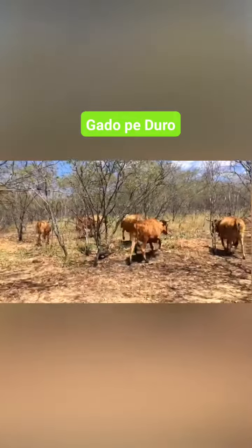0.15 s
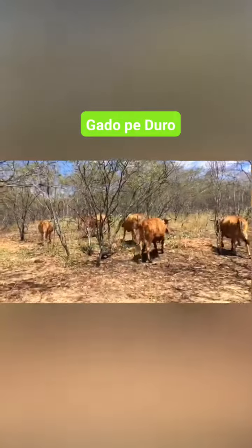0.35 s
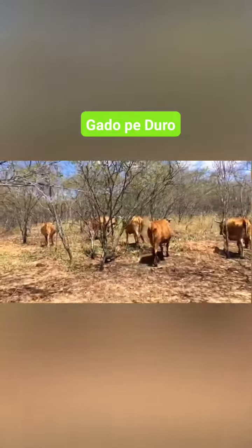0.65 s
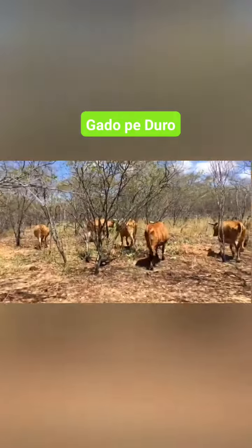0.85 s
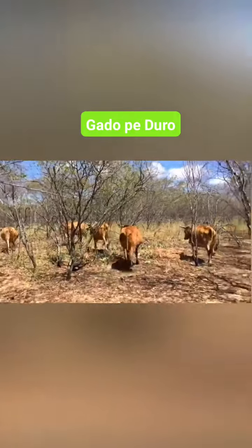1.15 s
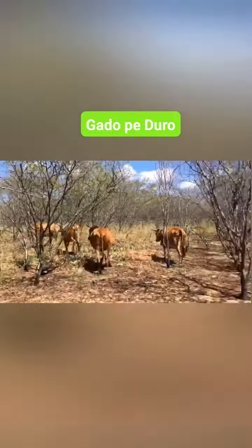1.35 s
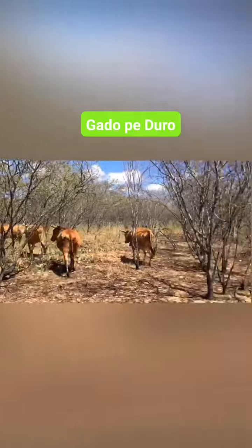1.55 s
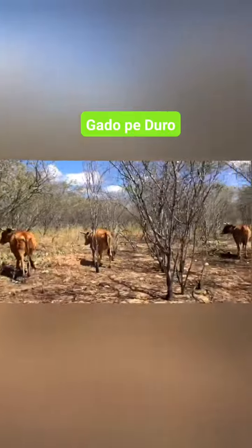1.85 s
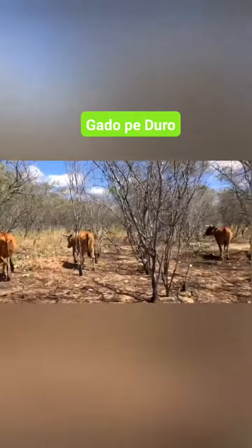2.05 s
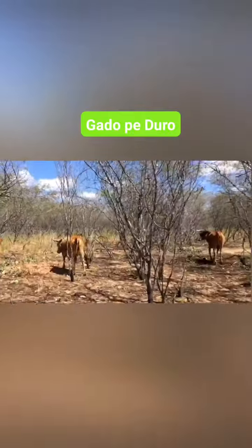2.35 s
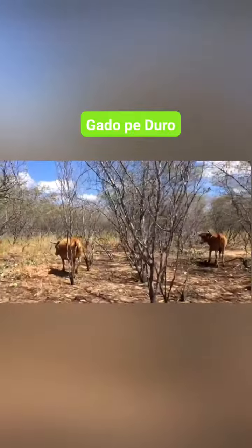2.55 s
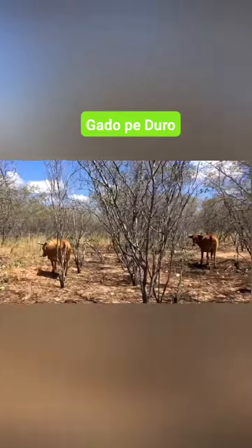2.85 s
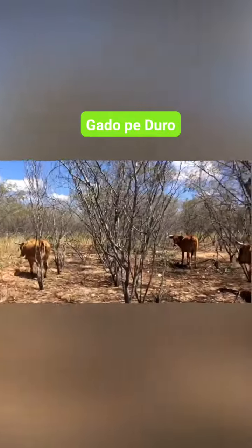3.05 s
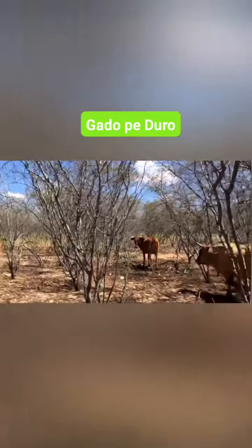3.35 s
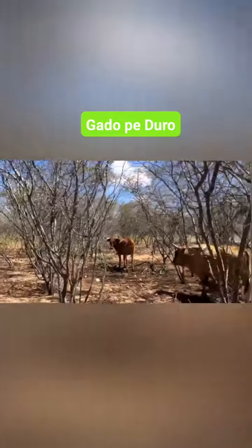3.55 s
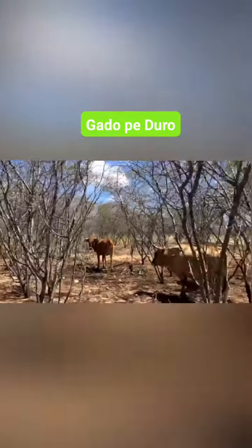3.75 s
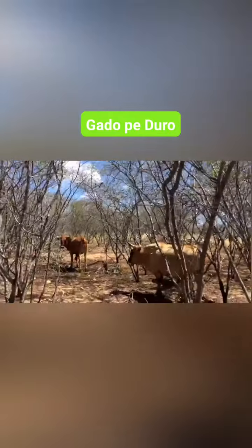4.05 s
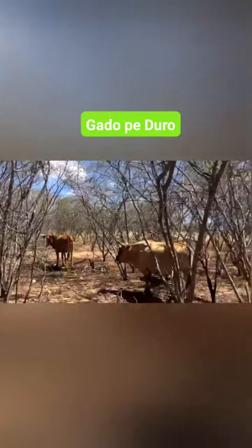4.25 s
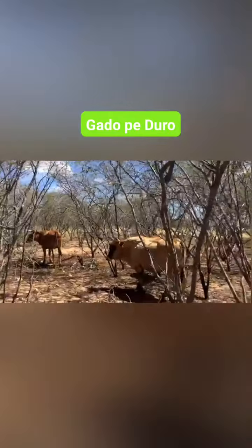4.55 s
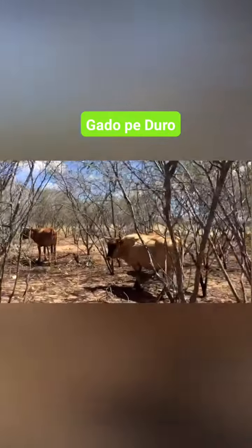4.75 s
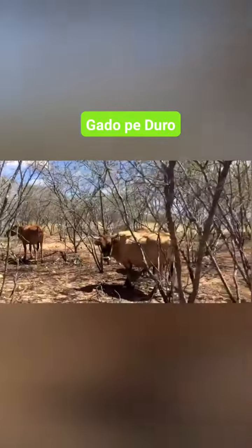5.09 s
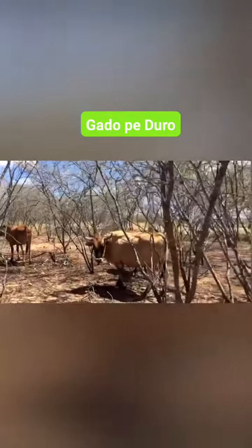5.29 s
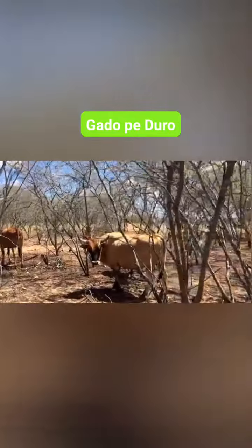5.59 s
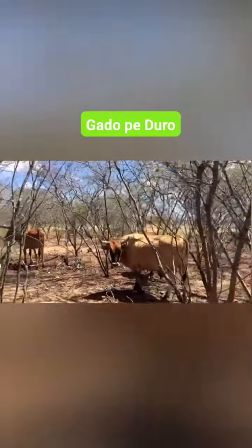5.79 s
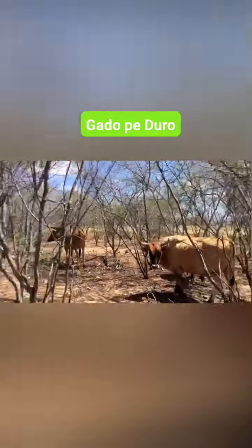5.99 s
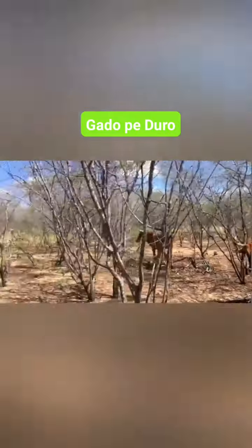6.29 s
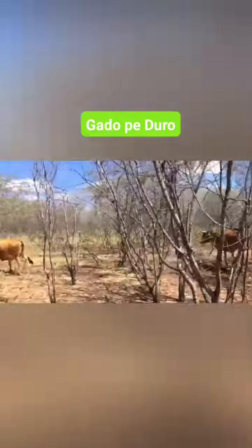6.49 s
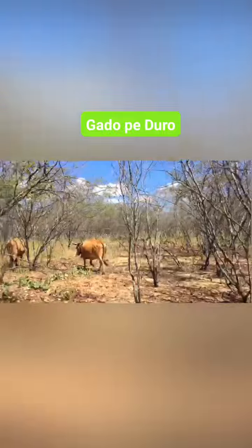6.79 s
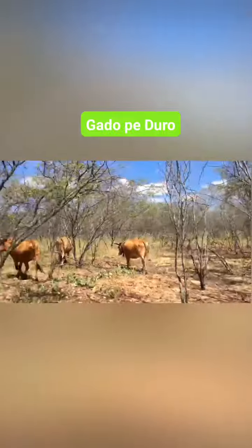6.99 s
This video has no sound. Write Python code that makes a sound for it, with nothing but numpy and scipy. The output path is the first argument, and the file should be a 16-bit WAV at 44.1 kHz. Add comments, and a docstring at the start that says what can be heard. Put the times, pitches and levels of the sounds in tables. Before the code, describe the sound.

Two sheet-iron cowbells clank close by in irregular, overlapping blows, dense and strong for the first two seconds, then sparser and softer. A third bell rings faintly farther off. Hooves thud softly on dry earth, leaves crunch and twigs crack, especially midway. Outdoors in open scrub with a thin echo; low wind gusts bump the handheld microphone, strongest around five seconds.

```python
"""A sheet-iron bell is still ringing as cattle walk close by through dry scrub, a second bell beside it.
Each clapper blow rings a low hum, two strong wall modes and a cloud of overtones, all decaying sines.
A third bell rings further off with its longest modes alone. Hooves thud and crush dry leaves and twigs
snap, all shaped noise with a thin echo from the scrub. Still air and gusts of wind on the microphone,
filtered noise with moving levels, lie over it all."""
import sys
import numpy as np
from scipy import signal
from scipy.fft import rfft, irfft, next_fast_len
from scipy.io import wavfile
from scipy.ndimage import uniform_filter1d

SR = 44100
rng = np.random.default_rng(int(sys.argv[2]) if len(sys.argv) > 2 else 0)


def file_out(sig):
    """Save sig as 16-bit WAV at sys.argv[1]."""
    # one column per channel
    cols = np.atleast_2d(sig).T
    # limit, then scale
    lim = np.clip(cols, -1, 1)
    pcm = np.round(lim * 32767).astype(np.int16)
    wavfile.write(sys.argv[1], SR, pcm)


N = 314433
TIME = np.arange(N) / SR  # seconds

# Clapper blows on the two near bells. Each row: start in seconds, strength in dB, hardness in dB,
# place on the wall from 0 (broad face) to 1 (folded edge).
LEAD_BLOWS = [(.095, -41, -12, .1), (.152, -26.5, 1.5, 0.81), (.336, -18, -8.5, 0.031),
              (.372, -28, -3, 0.94), (.51, -27, -9, 0.31), (.738, -21, -8, 0.69), (.907, -31, 14, 0.1),
              (1.034, -28.5, -4, 0.16), (1.206, -38.5, 0.5, .03), (1.328, -35.5, 5.5, 0.65),
              (1.498, -24.5, 2, 0.75), (1.623, -33, -0.5, 0.095), (1.753, -29, -15, .15),
              (1.837, -45, 4.5, 0.37), (1.906, -36.5, 1, .16), (1.929, -28.5, 0.5, 0.53),
              (2.113, -37.5, 0.5, 0.49), (2.183, -42, 5, 0.57), (2.227, -44, -2, 0.58),
              (2.655, -38, -2.5, .03), (2.748, -38.5, -1.5, 0.86), (2.785, -33.5, 2, 0.56),
              (3.198, -35, 4.5, 0.63), (3.364, -29, -1.5, .77), (3.76, -36.5, 1, 0.37),
              (3.998, -35.5, 5.5, 0.86), (4.1, -33.5, -4, 0.59), (4.328, -40, -3, 0.64),
              (4.418, -36, 4, 0.59), (4.678, -41, 9.5, 0.39), (4.773, -41, -10.5, 0.22),
              (5.063, -40, 1.5, 0.54), (5.282, -40.5, 4.5, 0.62), (5.345, -39.5, 2.5, 0.5),
              (5.739, -40, 4, 0.9), (5.962, -42.5, 6, 0.43), (6.358, -50, 12.5, 0.9),
              (6.58, -40.5, 1, 0.23), (6.81, -50, 6, 0.21), (6.997, -49, 10, 0.18)]
SECOND_BLOWS = [(.057, -38.5, 3, 0.13), (.311, -28.5, 4, 0.041), (.95, -37.5, 5, 0.063),
                (2.543, -34, 4, 0.11), (3.057, -34, 8.5, 0.073), (3.679, -34.5, -3, .03),
                (3.698, -49.5, 16.5, 0.27), (4.03, -41.5, 7, .1), (5.103, -35, 8, 0.36),
                (5.79, -34, 10, 0.28), (6.491, -34, 6.5, 0.66), (7.029, -48.5, 23, 0.16),
                (7.108, -42.5, 10, 0.44)]
# Modes of the near bells in six families: low hum (short mouth note and long, low bending modes of the wall),
# first wall mode (the lead's with its overtone), second wall mode, overtones, upper overtones, shimmer.
# Each row within a family: frequency in Hz, relative level in dB, time to fall 60 dB in seconds.
LEAD_BELL = [
    [(653.5, 4, .28), (630, 1, .1), (620, -14, 1.4), (645, -10, .75)],
    [(1621, 0, 1.35), (3477, -6.5, .36)],
    [(1683, 0, 1.05)],
    [(2488, -24, .6), (2663, -16, .3), (2764, -4, .3), (2846, -6, .28), (2959, -5.5, .55),
     (3133, -11.5, .8)],
    [(3414, -15, .3), (4042, -7, .3), (4154, 0, .42), (4365, -18, .45), (4520, -11, .2)],
    [(5079, -8, .22), (5283, -9, .14), (5410, -11, .22), (6075, -10, .26), (6262, -6, .26), (6627, -8, .24),
     (6768, -10, .2), (7290, -8, .2), (8135, -11, .17), (8679, -9, .17), (9029, -7, .19), (9214, -9, .16),
     (9680, -10, .19), (10232, -10, .16), (10356, -10, .16), (11280, -11, .14)],
]
SECOND_BELL = [
    [(672, 4, .48), (648, -13, 1.1), (630, -6, .1), (620, -15, 1.4)],
    [(1700.5, 0, .55)],
    [(1786, 1, 1.8)],
    [(2525, 0, .27), (2642, -7, .5), (2815, -7, .25)],
    [(3136, -10, .6), (3205, -6, .7), (3293, -6, .23), (3370, -14, .4), (3937, -6, .4), (4021, -7, .35)],
    [(5066, -7, .25), (5398, -10, .3), (5640, -12, .15), (6090, -13, .2), (6950, -12, .22),
     (7800, -12, .17), (8700, -12, .13), (8830, -10, .14), (10140, -10, .17), (11260, -11, .16)],
]
# How the six families answer a blow. Each row: level in dB struck on the face, level in dB struck on the edge.
LEAD_ANSWER = [(-2.5, 3), (-0.5, -24), (-25, 0), (0, 0.5), (-8, -15), (-11.5, -7)]
SECOND_ANSWER = [(2, 2.5), (1, -26), (-14, 0.5), (-11, 6), (-11.5, -5.5), (-8, -3.5)]
# Share of a blow's hardness that reaches each family [factor]; the first and second wall modes
# follow almost strength alone.
HARDNESS_SHARE = [0.83, 0, 0.055, 0.91, 1, 0.96]
# How well each bell's low hum carries as the animal turns. Each row: time in seconds, gain in dB.
LEAD_FACING = [(0, -6.5), (1.55, -5.5), (2, 0), (4.4, -2), (5.2, 3.5), (6, 2), (7, 11.5)]
SECOND_FACING = [(.3, -4.5), (2.5, -0.5), (5.8, -0.5), (7.1, -6.5)]
# Wall modes already sounding at the start. Each row: frequency in Hz, level in dB, 60 dB decay in seconds.
EARLY_RING = [(590, -58, 2.7), (675, -47, 0.36), (1620, -36, 1), (1745, -45, 0.42), (1890, -61, 0.91),
              (3010, -43, 0.22)]
# Lowest and highest centre of the cloud of weak modes [Hz].
CLOUD_HZ = 4500, 12400
# Crack of iron on iron. Each row: frequency in Hz, relative level in dB.
CRACK_COLOUR = [(300, -21), (900, 13.5), (2000, 19.5), (3000, 19.5), (5000, 12.5), (9000, -1), (13000, -32)]

# Hoof falls. Each row: time in seconds, thud level in dB, crunch level in dB.
STEPS = [(0.529, -50, -61), (0.659, -41.5, -54), (0.827, -48, -57), (1.9, -75, -56), (2.438, -60, -53),
         (2.904, -53, -62), (3.4, -68, -51), (3.5, -64, -50), (3.718, -46, -65), (3.856, -39.5, -49),
         (4.17, -51, -67), (4.769, -57, -51), (6.121, -77, -67), (6.432, -33, -48.5), (6.92, -58, -67)]
# Animals brushing through dry leaves. Each row: peak in seconds, level in dB, half length in seconds.
BRUSHES = [(.6, -61, 0.37), (3.3, -61, 0.37), (6.76, -53, .04), (7.11, -62, 0.034)]
# Spectra of crushed leaves and of thuds on dry earth. Each row: frequency in Hz, relative level in dB.
LEAF_COLOUR = [(200, -10), (600, -1), (1300, 0), (2200, -8), (5000, -12), (9500, -12), (13000, -28)]
THUD_COLOUR = [(40, -41), (130, -4.5), (220, 1.5), (340, -4.5), (550, -36), (1500, -35)]
# Snapping twigs. Each row: start in seconds, level in dB, brightest frequency in Hz.
TWIGS = [(.662, -55, 1770), (2.44, -45.5, 1510), (3.033, -45, 2000), (3.308, -32, 2390),
         (3.36, -26.5, 1070), (3.376, -43, 4940), (3.646, -41.5, 1490), (3.967, -43, 1930),
         (4.161, -44, 1000), (4.402, -35, 1730), (4.775, -37.5, 1500), (4.879, -46, 2900),
         (6.232, -50.5, 2900), (6.688, -42.5, 5970), (6.715, -39, 5700), (6.791, -50, 4000)]

# Blows on the bell further off. Each row: start in seconds, low mode level in dB, high modes level in dB.
FAR_BLOWS = [(0.274, -47, -46), (0.898, -48.5, -46), (1.207, -65.5, -40), (1.906, -53, -44),
             (2.227, -49.5, -42), (4.102, -51.5, -47.5), (4.519, -51, -48.5), (5.061, -66, -44)]
# Modes of that bell. Each row: frequency in Hz, relative level in dB, time to fall 60 dB in seconds.
FAR_LOW = [(948, 0, 2.0)]
FAR_HIGH = [(2385, 0, .9), (4520, -3, .45)]
# Echo from trunks and ground. Each row: frequency in Hz, relative level in dB.
ECHO_COLOUR = [(200, 5), (2500, 9), (5000, -24), (12000, 5.5)]

# Light breeze on the microphone, before trim and flutter. Each row: time in seconds, level in dB.
BREEZE = [(0, -68), (.3, -56.5), (.65, -68), (1.8, -64.5), (2.3, -54.5), (2.85, -67.5), (3.3, -59),
          (3.75, -62), (4.3, -49.5), (5.8, -42.5), (6.5, -47.5), (6.9, -66)]
# Gusts, and at 3.85 s the low thump of a hoof fall; trim and flutter act only on their rumble, not on
# their small eddies. Each row: peak in seconds, level in dB, half length in seconds.
GUSTS_AND_THUMP = [(2.211, -26.5, 0.029), (2.4, -30, 0.028), (2.573, -38.5, 0.019), (3.382, -39.5, 0.052),
                   (3.847, -33.5, 0.0026), (4.094, -31.5, 0.025), (4.267, -34.5, 0.028),
                   (4.352, -33, 0.033), (4.624, -35, 0.021), (4.743, -50, 0.012), (4.906, -29.5, 0.026),
                   (4.987, -16.5, 0.012), (5.015, -20.5, 0.022), (5.13, -23.5, 0.008), (5.238, -24, 0.011),
                   (5.267, -29.5, .03), (5.45, -38, 0.024), (5.541, -24.5, 0.03), (6.04, -31, 0.035),
                   (6.31, -40, 0.019), (6.409, -18.5, 0.0084), (6.444, -27.5, 0.027)]
# Spectra of wind rumble, small eddies and still air. Each row: frequency in Hz, relative level in dB.
WIND_COLOUR = [(15, -82), (30, 3.5), (52, 3.5), (80, 3), (125, -7), (200, -14.5), (320, -43), (600, -53),
               (2000, -99)]
BUFFET_COLOUR = [(20, -35), (55, 3.5), (130, 8.5), (250, -5), (450, -20), (800, -36), (2500, -111)]
AIR_COLOUR = [(20, -12), (60, 0), (150, 1), (400, -4), (1000, -7), (2000, -14), (5000, -26), (10500, -30),
              (13000, -45)]


def cowbell(blows, bell, cloud_db, cloud_t60, crack_db, grip, taps_db, scrape_db):
    """Each blow partly chokes the walls' old ring, then strikes the modes, the cloud and an iron crack."""
    walls, hum, contact = np.zeros((3, N))
    cloud_hz = np.linspace(*CLOUD_HZ, 110) + rng.uniform(-70, 70, 110)
    # cloud_t60 holds at 7 kHz; higher modes die sooner
    cloud = [(hz, cloud_db, cloud_t60 * 7000 / hz) for hz in cloud_hz]
    touch = 1 - np.exp(-TIME / 0.0014)
    crack_fade = fade(.05)
    for start, hum_db, first_db, second_db, over_db, upper_db, shimmer_db in blows:
        i = int(start * SR)
        choke = min(grip * undb(.5 * (shimmer_db + 38.0)), .9)
        walls[i:] *= 1 - choke * touch[:N - i]
        # the low hum takes a few cycles to swing up, and is not choked
        add(hum, start, undb(hum_db) * ring(bell[0], 0, rise=.0048))
        add(walls, start, undb(first_db) * ring(bell[1], 0, rise=0.0039))
        add(walls, start, undb(second_db) * ring(bell[2], 0, rise=0.00086))
        # the higher modes answer every small contact of the clapper, in a new mix each time
        push = chatter(shimmer_db, taps_db, scrape_db)
        high_families = [(over_db, bell[3], 2.5), (upper_db, bell[4], 3), (shimmer_db, bell[5] + cloud, 4)]
        for level_db, modes, scatter_db in high_families:
            add(walls, start, undb(level_db) * signal.fftconvolve(ring(modes, scatter_db), push))
        add(contact, start, undb(shimmer_db + crack_db) * crack_fade)
    crack = contact * colour(rng.standard_normal(N), CRACK_COLOUR)
    return swing(walls + hum + crack)


def strikes(blows, answer, facing):
    """Family levels per blow: the place blends face and edge, and a hard contact brings out the high modes."""
    face, edge = undb(answer).T
    rows = []
    for start, strength_db, hardness_db, place in blows:
        angle = place * np.pi / 2
        blend = np.hypot(face * np.cos(angle), edge * np.sin(angle))
        family_db = strength_db + hardness_db * np.array(HARDNESS_SHARE) + 20 * np.log10(blend)
        family_db[0] += np.interp(start, *np.transpose(facing))
        rows.append((start, *family_db))
    return rows


def ring(modes, scatter_db, rise=0.00023):
    """One blow on decaying sine modes; where the clapper lands varies their shares and phases, not the total."""
    t = TIME[:int(max(m[2] for m in modes) * SR)].astype(np.float32)
    out = np.zeros_like(t)
    usual = undb([m[1] for m in modes])
    share = usual * undb(scatter_db * rng.standard_normal(len(modes)))
    share = share * np.linalg.norm(usual) / np.linalg.norm(share)
    for (hz, _, t60), gain in zip(modes, share):
        decay = fade(t60)
        phase = 2 * np.pi * rng.random()
        wave = np.sin(float(2 * np.pi * hz) * t[:len(decay)] + phase)
        out[:len(decay)] += float(gain) * decay * wave
    return out * (1 - np.exp(-np.minimum(t / rise, 20)))


def chatter(hard_db, taps_db, scrape_db):
    """The clapper's push: one blow, a short scrape, three late taps; the softer the blow, the more it scrapes."""
    scrape_s, taps_s = .016, .018
    scrape = undb(scrape_db - .5 * (hard_db + 30)) / np.sqrt(scrape_s * SR / 2)
    push = scrape * rng.standard_normal(4096) * np.exp(-TIME[:4096] / scrape_s)
    push[0] = 1
    for late, size in rng.exponential(size=(3, 2)):
        i = min(int(late * taps_s * SR), len(push) - 1)
        push[i] += undb(taps_db) * np.sqrt(size)
    return push / np.linalg.norm(push)


def swing(x):
    """The bell swings on the neck: its path to the microphone wavers, and so does the bounce off the ground."""
    sway_s, ground_s, ground_db = .00005, .000966, -15
    # four times finer samples keep the treble clean while the delay moves
    fine = signal.resample_poly(x, up=4, down=1)
    direct = np.interp(TIME - sway_s * walk(4), np.arange(4 * N) / (4 * SR), fine)
    bounce = np.interp(TIME - ground_s - 2 * sway_s * walk(7), TIME, x)
    return direct + undb(ground_db) * bounce


def hooves():
    """Each hoof thuds on dry earth and crushes leaves: tiny random cracks whose level flickers."""
    grains_per_s, thud_s, crunch_s = 600, .012, .0097
    herd_db, herd_spread_db = -70.5, 4  # soft, uneven tread of the animals further off
    stir_db = -63.5  # steady stir of dry leaves
    grains = (rng.random(N) < grains_per_s / SR) * rng.choice([-1, 1], N)
    decay = fade(.012)
    crackle = signal.fftconvolve(grains, rng.standard_normal(len(decay)) * decay)[:N]
    thud = undb(herd_db + herd_spread_db * walk(18))
    crunch = np.hypot(undb(stir_db), swells(BRUSHES)) * undb(2.5 * walk(14))
    for at, thud_db, crunch_db in STEPS:
        away = np.abs(TIME - at)
        thud = thud + undb(thud_db) * np.exp(-away / thud_s)
        crunch = crunch + undb(crunch_db) * np.exp(-away / crunch_s)
    leaves = colour(crackle, LEAF_COLOUR) * crunch
    return leaves + colour(rng.standard_normal(N), THUD_COLOUR) * thud


def twigs():
    """A dry twig breaks in one short, broad crack of decaying noise."""
    out = np.zeros(N)
    decay = fade(.014)
    for start, db, hz in TWIGS:
        spectrum = [(hz / 4, -20), (hz, 0), (hz * 2, -5), (hz * 8, -26)]
        wood = colour(rng.standard_normal(8192), spectrum)
        add(out, start, undb(db) * wood[:len(decay)] * decay)
    return out


def far_bell():
    """Only the longest modes of the distant bell carry this far."""
    out = np.zeros(N)
    for start, low_db, high_db in FAR_BLOWS:
        add(out, start, undb(low_db) * ring(FAR_LOW, 0, rise=0.0028))
        add(out, start, undb(high_db) * ring(FAR_HIGH, 0.34, rise=0.0016))
    return out


def scrub(x):
    """Bare trunks and ground scatter a thin echo, starting 8 ms behind the direct sound."""
    decay = fade(.5)
    noise = colour(rng.standard_normal(N), ECHO_COLOUR)[:len(decay)]
    echo = noise * decay * (TIME[:len(decay)] > .008)
    echo = echo / np.linalg.norm(echo)
    return x + undb(-22) * signal.fftconvolve(x, echo)[:N]


def wind():
    """Breeze, gusts and one hoof thump rumble on the microphone port; the briefer a swell, the higher it reaches."""
    trim_db, flutter_db, lull_db = -1.5, 2, 3
    small_eddy_s = .014  # a swell of this half length splits its power evenly between rumble and eddies
    at, db, length = np.transpose(GUSTS_AND_THUMP)
    small = 1 / (1 + (length / small_eddy_s) ** 4)
    breeze = undb(curve(BREEZE) + lull_db * walk(8))
    broad = np.hypot(breeze, swells(zip(at, db + 10 * np.log10(1 - small), length)))
    rumble = colour(rng.standard_normal(N), WIND_COLOUR) * broad * undb(trim_db + flutter_db * walk(30))
    eddies = colour(rng.standard_normal(N), BUFFET_COLOUR)
    # even out the noise so that the swells alone set its level
    eddies = eddies / np.sqrt(uniform_filter1d(eddies ** 2, size=1500))
    return rumble + swells(zip(at, db + 10 * np.log10(small), length)) * eddies


def still_air():
    """The quiet air of the place: a soft noise bed whose level slowly wanders."""
    return colour(rng.standard_normal(N), AIR_COLOUR) * undb(-67 + 1.5 * walk(3))


def undb(db):
    """Decibels to gain."""
    return 10 ** (np.asarray(db) / 20)


def curve(rows):
    """Join rows of time in seconds and value by straight lines."""
    return np.interp(TIME, *np.transpose(rows))


def add(track, start, sound):
    """Mix a sound into the track from a start time in seconds on."""
    i = max(int(start * SR), 0)
    track[i:i + len(sound)] += sound[:N - i]


def colour(x, points):
    """Filter by a spectrum of Hz and dB points and scale to a standard deviation of 1."""
    hz, db = np.transpose(points)
    size = next_fast_len(len(x))
    bins = np.maximum(np.fft.rfftfreq(size, 1 / SR), 1)
    gain = undb(np.interp(np.log(bins), np.log(hz), db))
    y = irfft(rfft(x, size) * gain, size)[:len(x)]
    return y / np.std(y)


def walk(rate):
    """Smooth random wander with a standard deviation of 1, drawing new values at a rate in Hz."""
    k = int(SR / rate)
    steps = np.repeat(rng.standard_normal(N // k + 1), k)[:N]
    y = uniform_filter1d(uniform_filter1d(steps, k), k)
    return y / np.std(y)


def fade(t60):
    """Exponential decay, cut at -60 dB after t60 seconds."""
    return np.exp(TIME[:int(t60 * SR)].astype(np.float32) * float(-np.log(1000) / t60))


def swells(rows):
    """Envelope of bell-shaped swells (peak s, dB, half length s) whose powers add."""
    power = np.zeros(N)
    for at, db, length in rows:
        near = slice(*np.searchsorted(TIME, [at - 4 * length, at + 4 * length]))
        power[near] += undb(db) ** 2 * np.exp(-((TIME[near] - at) / length) ** 2)
    return np.sqrt(power)


def scene():
    """Bells and hooves among the bushes, over still air and wind."""
    lead_strikes = strikes(LEAD_BLOWS, LEAD_ANSWER, LEAD_FACING)
    lead = cowbell(lead_strikes, LEAD_BELL, cloud_db=-21.5, cloud_t60=0.21, crack_db=-0.5,
                   grip=.35, taps_db=-12, scrape_db=-7)
    add(lead, 0, ring(EARLY_RING, 0))
    second_strikes = strikes(SECOND_BLOWS, SECOND_ANSWER, SECOND_FACING)
    second = cowbell(second_strikes, SECOND_BELL, cloud_db=-22.5, cloud_t60=0.22, crack_db=-3.5,
                     grip=.4, taps_db=-13, scrape_db=-8)
    among_bushes = scrub(lead + second + hooves() + twigs() + far_bell())
    return (among_bushes + wind() + still_air())[None]


def record(dry):
    """The phone's microphone thins out the rumble below 42 Hz and cuts steeply above 12.5 kHz."""
    dry = signal.sosfilt(signal.butter(4, 42, "highpass", fs=SR, output="sos"), dry)
    return signal.sosfilt(signal.ellip(10, .2, 70, 12500, fs=SR, output="sos"), dry)


dry = scene()
out = record(dry)
file_out(out)
```